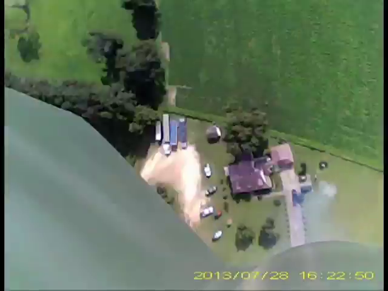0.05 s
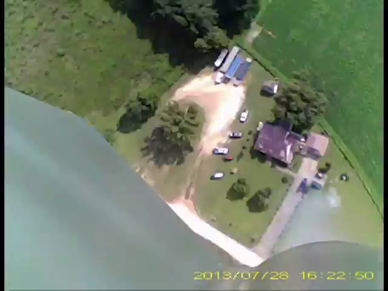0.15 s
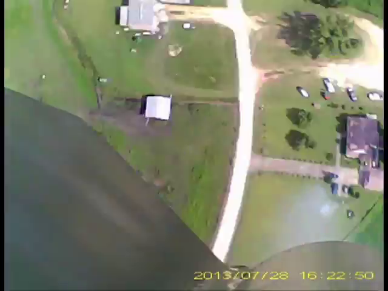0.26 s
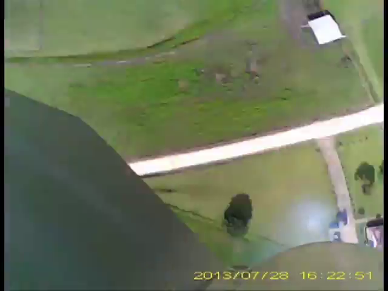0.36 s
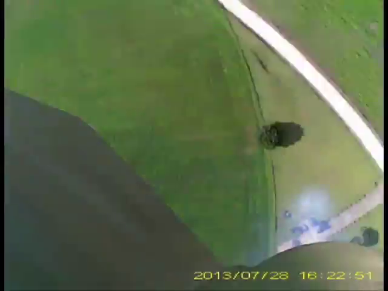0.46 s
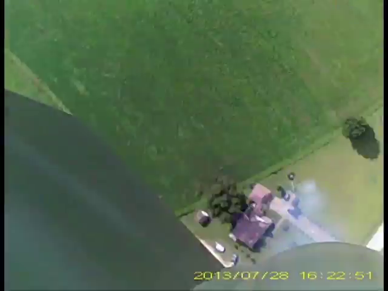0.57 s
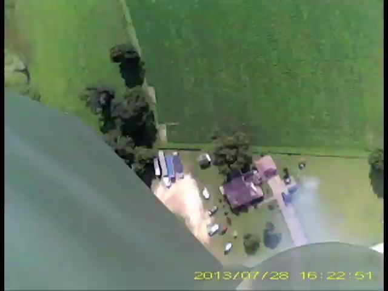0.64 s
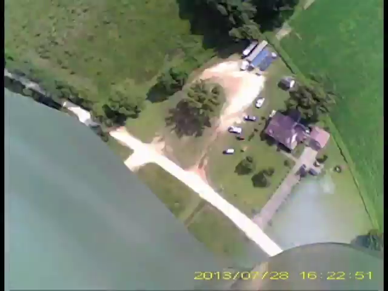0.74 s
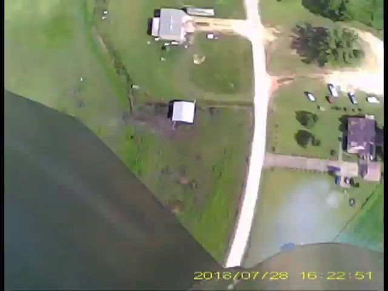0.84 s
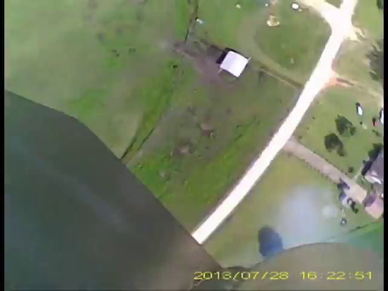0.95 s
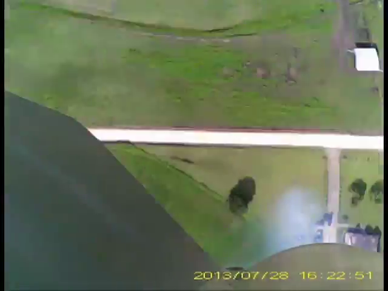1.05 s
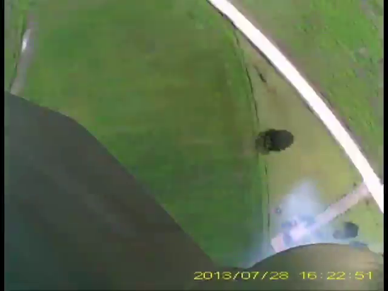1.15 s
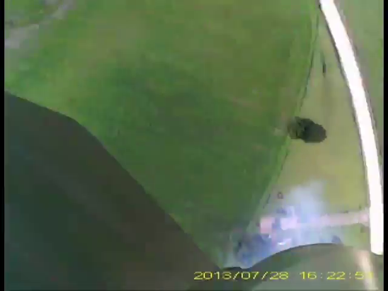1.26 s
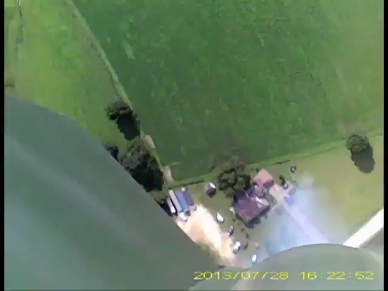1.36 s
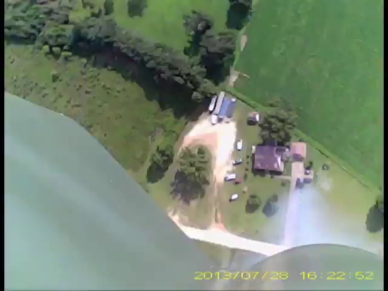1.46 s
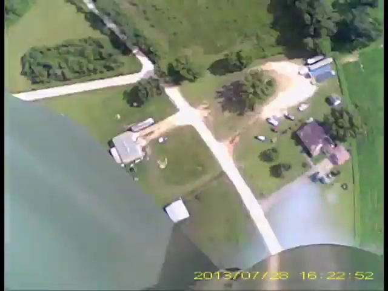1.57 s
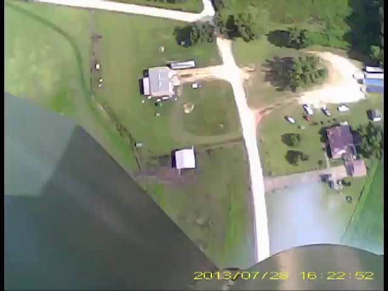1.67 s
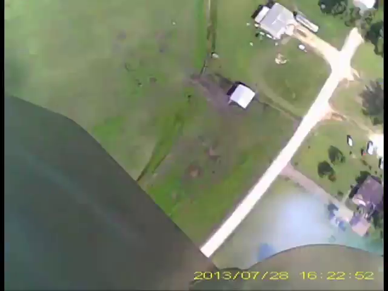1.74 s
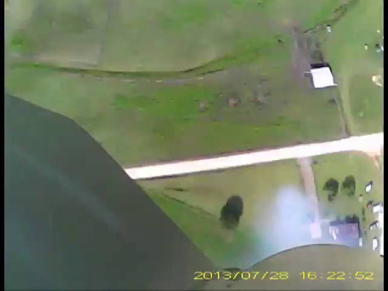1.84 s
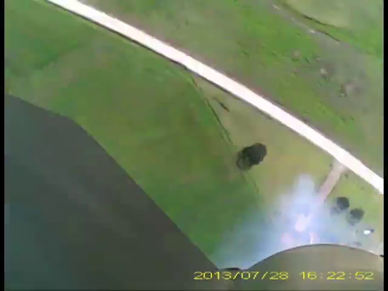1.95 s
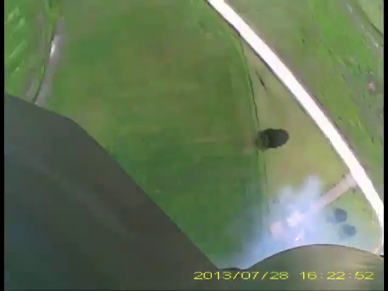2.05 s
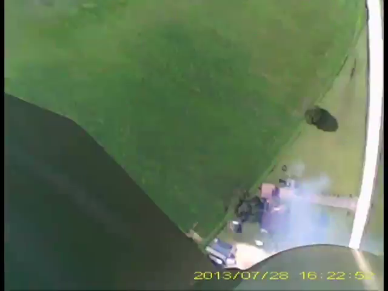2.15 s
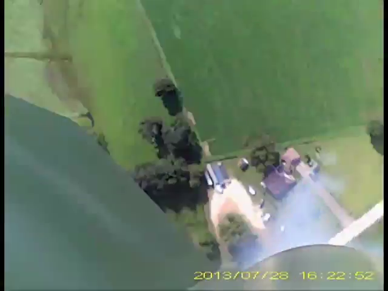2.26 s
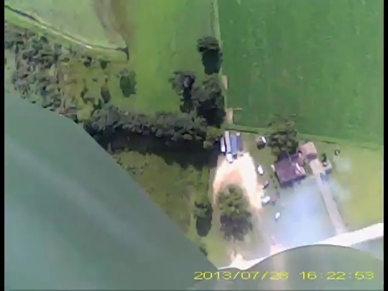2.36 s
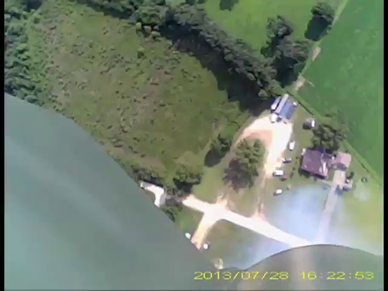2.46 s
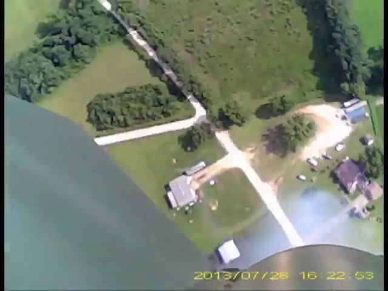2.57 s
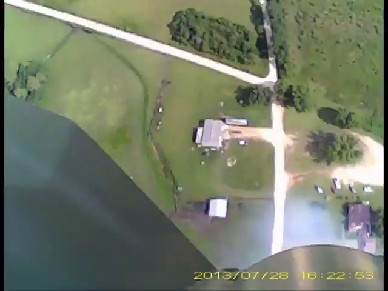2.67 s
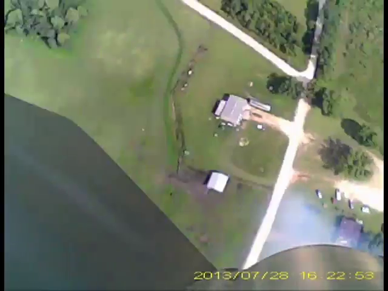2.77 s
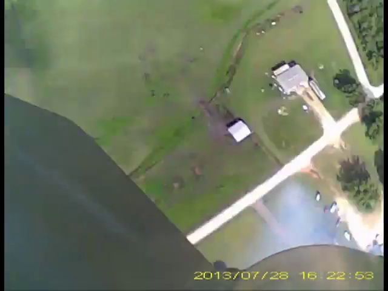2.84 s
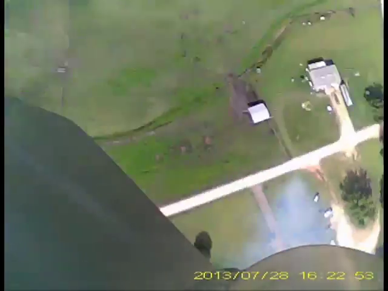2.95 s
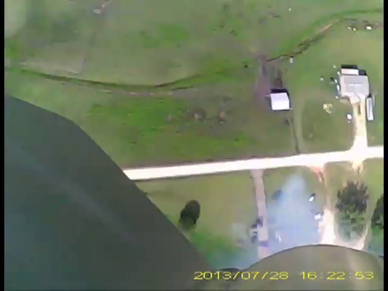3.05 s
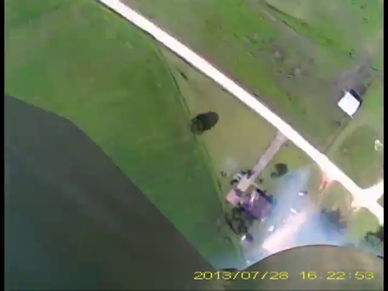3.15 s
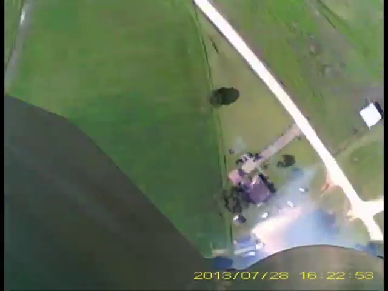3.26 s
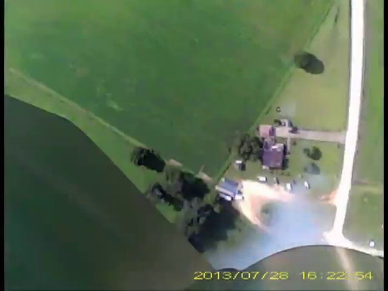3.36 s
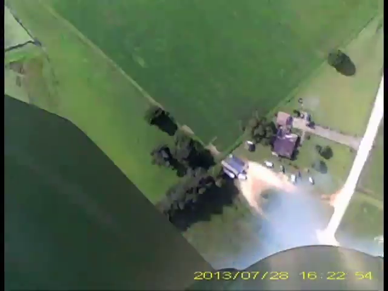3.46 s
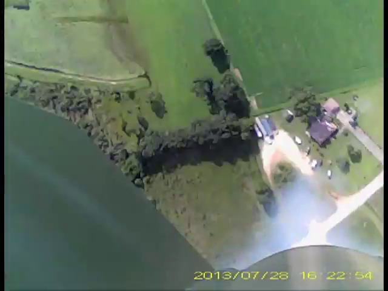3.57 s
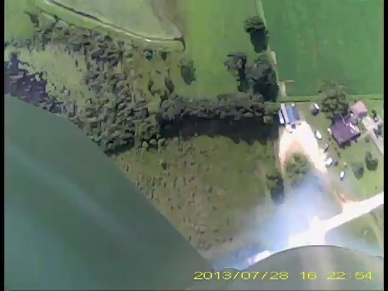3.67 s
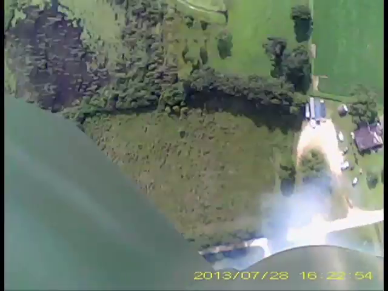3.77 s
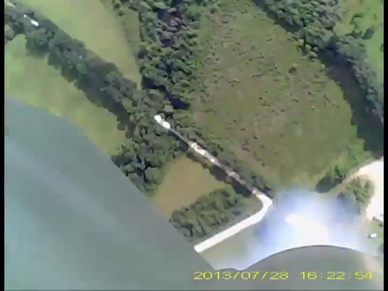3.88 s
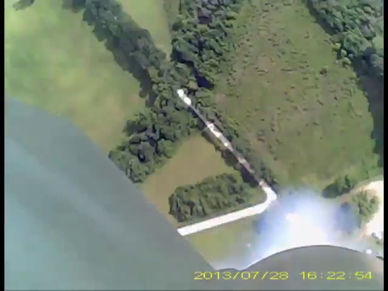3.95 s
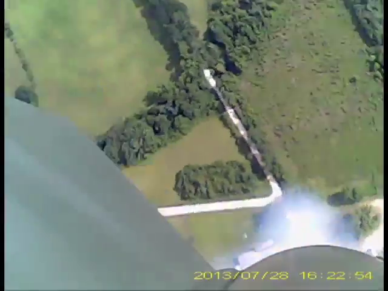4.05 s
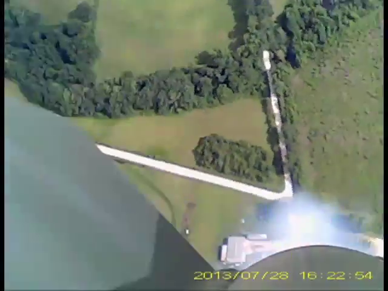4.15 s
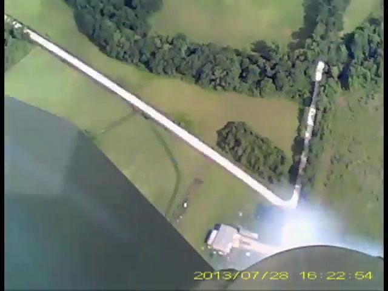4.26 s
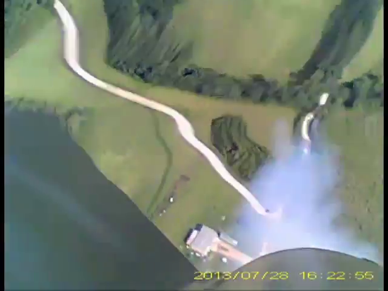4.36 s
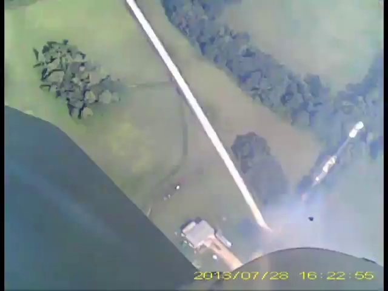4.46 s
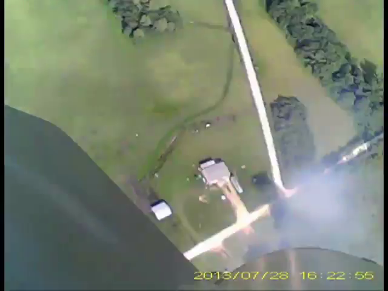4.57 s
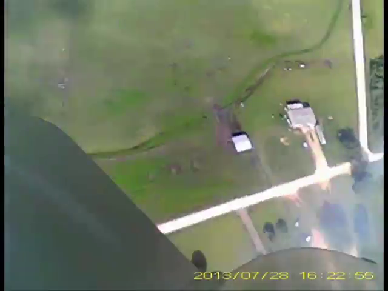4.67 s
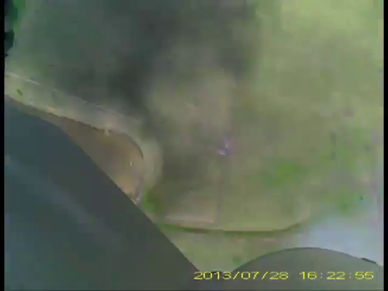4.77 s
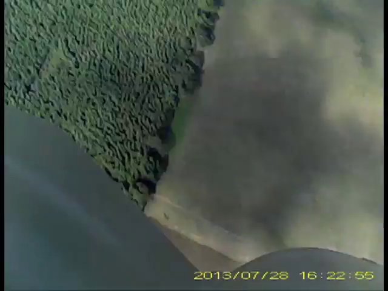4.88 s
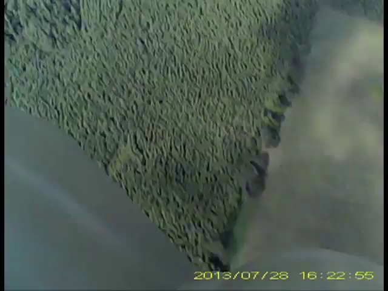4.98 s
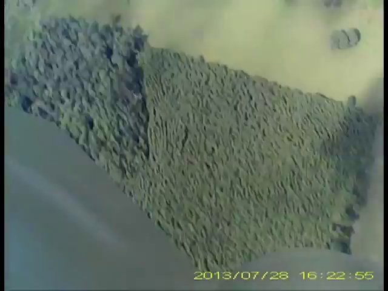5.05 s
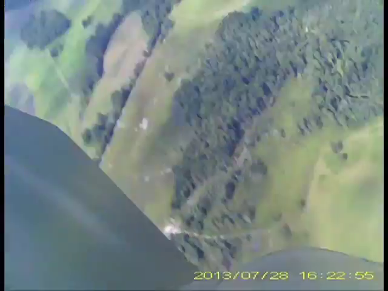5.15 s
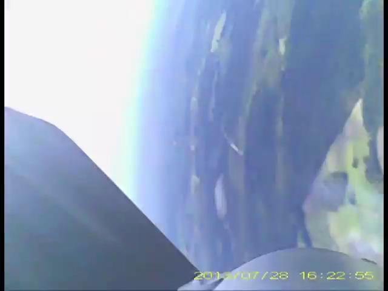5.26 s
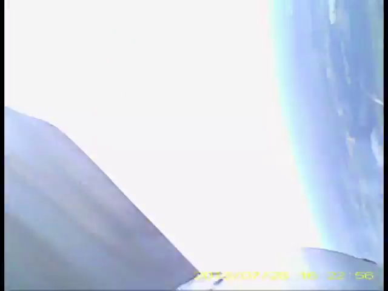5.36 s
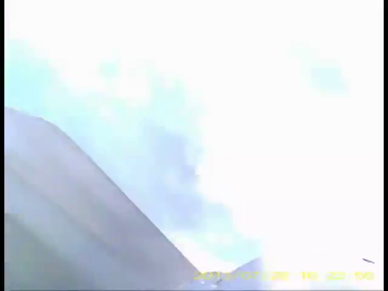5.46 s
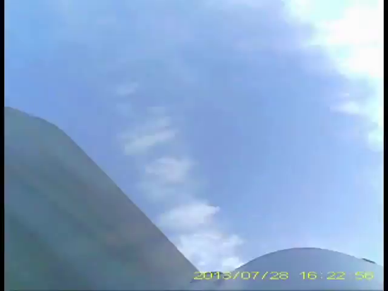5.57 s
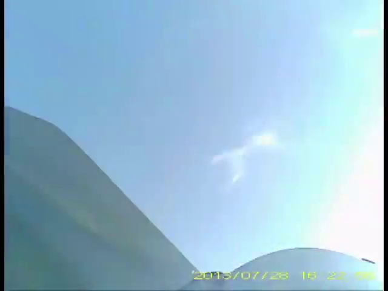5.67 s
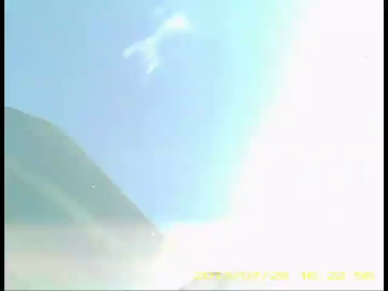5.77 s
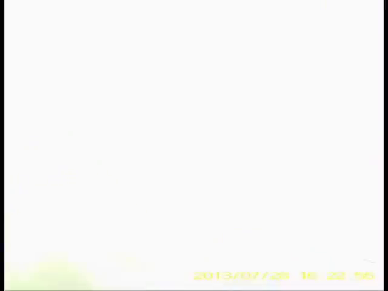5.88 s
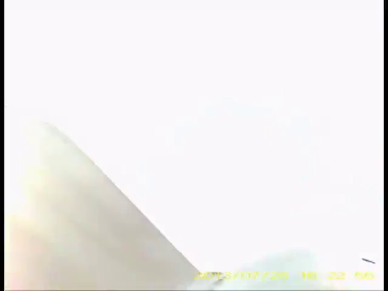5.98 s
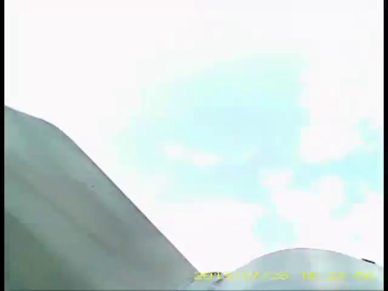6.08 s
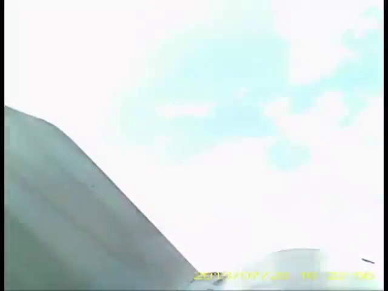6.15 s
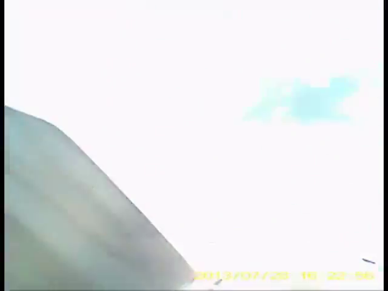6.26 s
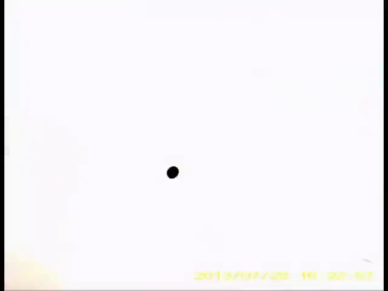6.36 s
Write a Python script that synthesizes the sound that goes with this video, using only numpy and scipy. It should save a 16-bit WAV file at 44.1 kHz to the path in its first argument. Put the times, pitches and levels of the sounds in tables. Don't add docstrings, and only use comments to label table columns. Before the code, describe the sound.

High outdoors on a small climbing rocket, air blasts over a tiny onboard microphone as a dense, clipped roar with a low wavering hum. It slowly weakens, breaks into bumpy gusts and whistling puffs, then falls abruptly to thuds, slaps and faint hiss. Near the end, a soft buffet and dry click break the quiet.

```python
import sys
import numpy as np
from scipy import signal
from scipy.fft import rfft, irfft
from scipy.io import wavfile
from scipy.ndimage import uniform_filter1d

SR = 44100
rng = np.random.default_rng(int(sys.argv[2]) if len(sys.argv) > 2 else 0)


def int16_out(signal):
    q = np.round(np.clip(np.atleast_2d(signal).T, -1, 1) * 32767)
    wavfile.write(sys.argv[1], SR, q.astype(np.int16))


def level_to_linear(level):
    exponent = np.asarray(level, float) / 20
    return 10 ** exponent


N = 283122
T = np.arange(N) / SR
DETACH_S, STALL_S = 4.3, 5.09

# frequency in Hz, density in dB per Hz.
RUSH_SPECTRUM = [(250, -16.5), (500, -3), (750, -1.5), (1100, -4), (1600, -14.5), (3000, -32), (8000, -70)]
# frequency in Hz, density in dB per Hz.
HISS_SPECTRUM = [(600, -24), (1200, 0.5), (1700, -0.5), (2100, -1.5), (2800, -13.5), (3500, -15.5),
                 (4300, -14), (5000, -33.5), (7000, -47.5), (11500, -40)]
# frequency in Hz, density in dB per Hz.
SPRAY_SPECTRUM = [(1500, -25), (2800, -3), (4200, -7.5), (5500, -21), (8000, -11.5), (11500, -12)]
# frequency in Hz, bandwidth in Hz.
HOUSING_MODES = [
    (690, 520),
    (1610, 250),
    (4400, 250),
]


def evened(x):
    return x / np.sqrt(np.mean(x ** 2) + 1e-20)


def columns(rows):
    s, *values = np.transpose(rows)
    return [np.interp(T, s, v) for v in values]


def add(mix, s, sound):
    part = mix[round(s * SR):][:len(sound)]
    part += sound[:len(part)]


def resonate(x, hz, width):
    turn = np.exp(2j * np.pi * np.cumsum(hz * np.ones(len(x))) / SR)
    r = np.exp(-np.pi * width / SR)
    return 2 * (turn * signal.lfilter([1 - r], [1, -r], x / turn)).real


def turbulence(points):
    hz, db = np.transpose(points)
    shape = level_to_linear(np.interp(np.log(np.fft.rfftfreq(N, 1 / SR) + 1), np.log(hz), db))
    return evened(irfft(rfft(rng.standard_normal(N)) * shape, N))


def flicker(size):
    return evened(uniform_filter1d(uniform_filter1d(rng.standard_normal(N), size), size))


def swells(rows, column):
    out = np.zeros(N)
    for row in rows:
        progress = np.clip((T - row[0]) / row[1], 0, 1)
        out += level_to_linear(row[column]) * np.sin(np.pi * progress)
    return out


def follow(flow, attached_db, detach_db, stall_db, floor_db):
    switch_s = 0.052
    detached, stalled = (np.clip((T - s) / switch_s + .5, 0, 1) for s in (DETACH_S, STALL_S))
    return np.hypot(flow * level_to_linear(attached_db + detach_db * detached + stall_db * stalled), level_to_linear(floor_db))


def flow_pressures():
    # time in seconds, along the body in dB, across it in dB.
    flow_curve = [(0, 3, -1.5), (3.0, 0.5, -8.5), (4.1, -3, -7.5), (4.28, -4.5, -9), (4.33, -10, -2),
                  (4.54, -6, -7), (4.72, -3, -13.5), (4.85, -8, -15), (5.08, -10.5, -15),
                  (5.1, -19.5, -15.5), (5.33, -26, -25), (5.37, -42, -35), (5.52, -61, -38),
                  (5.96, -47, -50), (6.18, -49, -43), (6.29, -36.5, -30.5), (6.34, -40, -30.5),
                  (6.42, -43, -35)]
    # start in seconds, length in seconds, across in dB, along in dB.
    gusts = [
        (4.15, 0.11, -4, -15),
        (5.1, 0.043, -17, -17.5),
        (5.17, 0.031, -6.5, -18),
        (5.215, 0.094, -16.5, -16),
        (5.325, 0.045, -17, -28),
        (5.53, 0.12, -27, -53),
        (5.69, .04, -35, -54),
        (5.76, 0.068, -35.5, -49),
        (6.09, 0.099, -30.5, -44),
        (6.32, .04, -19.5, -46),
    ]
    along_db, steady_db = columns(flow_curve)
    steady = level_to_linear(steady_db)
    along = np.hypot(level_to_linear(along_db), swells(gusts, column=3))
    across = np.hypot(steady, swells(gusts, column=2))
    return along, across, steady


def vortex_hum(along):
    # start in seconds, length in seconds, level in dB.
    lock_ins = [
        (.15, 0.36, -6.5),
        (.45, 0.61, -4),
        (1.15, 0.3, -7),
        (1.85, 0.31, -5),
        (2.3, 0.38, -5),
        (2.7, 0.21, -11),
        (3.95, 0.2, -10),
    ]
    shed_hz = np.maximum(190 - 6 * T - 5.2 * T ** 2, 40)
    hum = evened(resonate(rng.standard_normal(N), shed_hz, 30))
    return np.hypot(follow(along, -13, -7, -23, -80), swells(lock_ins, column=2)) * hum


def large_eddies(across, steady, loose):
    # start in seconds, length in seconds, level in dB.
    heaves = [(4.18, 0.15, -13), (4.42, 0.23, -9.5), (5.08, 0.027, -16), (5.12, .05, -12),
              (5.325, 0.05, -12.5), (5.36, .06, -18), (5.43, 0.054, -19), (5.53, 0.18, -23),
              (5.71, 0.071, -32), (5.76, 0.14, -31.5), (6.3, 0.25, -22.5)]
    # frequency in Hz, density in dB per Hz.
    rumble_spectrum = [(15, -3.5), (40, -2.5), (100, 2), (200, -7.5), (500, -29), (2000, -63.5)]
    # frequency in Hz, density in dB per Hz.
    buffet_spectrum = [(60, -10), (150, -5), (300, 0), (450, -1), (800, -20), (1500, -30), (4000, -73)]
    rumble_lumps_db, buffet_lumps_db = 1.0, 2.5
    lumps = loose * flicker(size=700)
    rumble = np.hypot(follow(steady, -7, 1, 4.5, -71), swells(heaves, column=2))
    rumble = rumble * level_to_linear(rumble_lumps_db * lumps) * turbulence(rumble_spectrum)
    return rumble + across * level_to_linear(buffet_lumps_db * lumps) * turbulence(buffet_spectrum)


def small_eddies(along, loose):
    rush_lumps_db, crackle_db, ring_db = 1.0, 3.0, -4
    hiss_fade_db_per_s, spray_fade_db_per_s = 0.5, 1.2
    early = np.minimum(T, DETACH_S)
    slow = np.interp(T, [4.9, 5.15], [0, 1])
    lumps = level_to_linear(rush_lumps_db * loose * flicker(size=500) + crackle_db * slow * flicker(size=70))
    port = HOUSING_MODES[1]
    sing = evened(resonate(resonate(rng.standard_normal(N), *port), *port))
    sing = level_to_linear(ring_db) * slow * sing
    rush = along * lumps * turbulence(RUSH_SPECTRUM)
    hiss_gain = follow(along / level_to_linear(hiss_fade_db_per_s * early), 2, -4.5, -5.5, -50.5)
    hiss = hiss_gain * lumps * (turbulence(HISS_SPECTRUM) + sing)
    spray_gain = follow(along / level_to_linear(spray_fade_db_per_s * early), -7.5, -15, -8, -57.5)
    return rush + hiss + spray_gain * turbulence(SPRAY_SPECTRUM)


def airstream():
    along, across, steady = flow_pressures()
    loose = np.interp(T, [4.0, 4.3], [.4, 1.3])
    return vortex_hum(along) + large_eddies(across, steady, loose) + small_eddies(along, loose)


def puffs():
    # time in seconds, port ring in dB, rise in seconds, fall in seconds, capsule against port in dB.
    whistles = [(4.246, 4, 0.0027, 0.028, -17), (4.43, -5, .001, 0.029, -19),
                (5.408, -39, .0034, .008, -26), (5.448, -37, 0.0029, .02, -24),
                (5.485, -40, .004, 0.033, -20), (5.762, -52, .006, .012, -13),
                (5.839, -24.5, 0.0096, 0.015, -14), (5.852, -26, 0.0049, .009, -16),
                (5.857, -24, 0.00075, 0.0036, -6), (5.885, -36, .006, .01, -16),
                (5.929, -22, 0.0069, 0.018, -15), (5.956, -32, .008, 0.017, -11),
                (5.984, -27.5, 0.011, 0.018, -9), (6.016, -37, .0052, 0.0069, -20),
                (6.047, -41, .005, .01, -20), (6.092, -31.5, .012, 0.028, -17),
                (6.276, -33.5, .006, .008, -20), (6.373, -25, 0.00085, 0.011, -10)]
    # time in seconds, port ring in dB, rise in seconds, fall in seconds.
    flutters = [(4.296, -17, .003, .01), (4.343, -8.5, .004, 0.022), (4.392, -12, .0044, 0.0083),
                (4.917, -9, 0.0027, 0.013), (4.946, -13, .002, 0.0075), (4.978, -8.5, 0.0093, 0.013),
                (5.015, -17, .0043, .01), (5.039, -18, .002, .017), (5.066, -17, .0081, .014),
                (5.26, -28, .001, 0.0024), (5.271, -35, .001, .003), (5.284, -33, 0.0013, 0.0035),
                (5.864, -32, .002, 0.011)]
    # time in seconds, port ring in dB, rise in seconds, fall in seconds.
    thuds = [
        (5.248, -44, .002, 0.02),
        (5.297, -32, .001, .005),
        (5.331, -32, .001, 0.0068),
        (5.536, -38, .0008, 0.0023),
        (5.546, -36, .001, 0.0032),
        (5.557, -35.5, 0.004, .011),
        (5.604, -37, 0.0057, .01),
        (5.622, -45, .001, .003),
        (6.333, -32.5, .005, 0.0062),
    ]
    rows = [(*r, 4.8, -13) for r in flutters]
    rows += [(*r, 13.1, -32) for r in thuds]
    rows += [(*r[:-1], -5, r[-1]) for r in whistles]

    noise = rng.standard_normal(N)
    shell, port, capsule = (evened(resonate(resonate(noise, hz, w), hz, 3 * w)) for hz, w in HOUSING_MODES)
    port = port + level_to_linear(-5) * turbulence(HISS_SPECTRUM)
    shell = resonate(shell + turbulence(RUSH_SPECTRUM), HOUSING_MODES[0][0], 900)
    capsule = capsule + level_to_linear(-14) * turbulence(SPRAY_SPECTRUM)
    out = np.zeros(N)
    for s, db, rise, fall, shell_db, capsule_db in rows:
        start = round(s * SR)
        at = slice(start, start + round((rise + 2 * fall) * SR) + 20)
        jet = evened(port[at]) + level_to_linear(shell_db) * evened(shell[at]) + level_to_linear(capsule_db) * evened(capsule[at])
        t = np.arange(len(jet)) / SR
        attack = np.minimum(t / max(rise, 1e-4), 1)
        decay = np.exp(-(np.maximum(t - rise, 0) / max(fall, 1e-3)) ** 3)
        add(out, s, level_to_linear(db) * jet * attack * decay)
    return out


def slaps():
    # time in seconds, peak in dB, frequency in Hz, length in cycles.
    slap_rows = [(4.989, 7, 302, 0.8), (5.14, -10, 60, 0.59), (5.177, -5, 250, 2.0), (5.193, 2.5, 60, 0.64),
                 (5.221, 2, 330, 1.6), (5.228, -3.5, 218, 1.7), (5.329, 4, 202, 0.99),
                 (5.342, -14, 130, 0.62), (5.441, -14, 150, 1.7), (5.456, -5, 172, 1.1),
                 (5.458, -17, 600, 1.5), (5.57, -18, 138, 1.05), (6.3359, -5.5, 240, 2.5),
                 (6.349, -17, 40, 1), (6.373, -17, 150, 3.9)]
    lead_turns = 0.34
    out = np.zeros(N)
    for s, db, hz, cycles in slap_rows:
        turns = np.arange(0, cycles, hz / SR)
        swing = np.sin(2 * np.pi * (turns + lead_turns))
        add(out, s, level_to_linear(db) * swing * np.sin(np.pi * turns / cycles))
    return out


def snap():
    start_s, level_db, fall_s = 6.3715, -20, 0.006
    t = np.maximum(T - start_s, 0)
    return level_to_linear(level_db) * turbulence(SPRAY_SPECTRUM) * (t > 0) * np.exp(-t / fall_s)


def scene():
    return (airstream() + puffs() + slaps() + snap())[None]


def preamp(x):
    rail, knee, self_noise_db = 0.69, 8.3, -57
    x = x / (1 + abs(x / rail) ** knee) ** (1 / knee)
    x = x + level_to_linear(self_noise_db) * rng.standard_normal(N)
    for pole_hz in (2040, 3450):
        r = np.exp(-2 * np.pi * pole_hz / SR)
        x = signal.lfilter([1 - r], [1, -r], x)
    return x


def low_rate_sampling(x):
    edge_hz, mirror_hz, mirror_db = 11110, (13300, 14650), -30.5
    low_pass = signal.firwin(255, edge_hz, window=("kaiser", 6), fs=SR)
    x = signal.oaconvolve(x, low_pass[None], "same")
    mirror = x * (-1.) ** np.arange(N)
    band_pass = signal.firwin(255, mirror_hz, pass_zero=False, window=("kaiser", 9), fs=SR)
    return x + level_to_linear(mirror_db) * signal.oaconvolve(mirror, band_pass[None], "same")


def band_limit(x):
    return signal.sosfilt(signal.butter(12, 14815, fs=SR, output="sos"), x)


def record(dry):
    x = preamp(dry)
    x = x + level_to_linear(-92) * evened(resonate(rng.standard_normal(N), hz=10740, width=40))
    return band_limit(low_rate_sampling(x))


dry = scene()
out = record(dry)
int16_out(out)
```